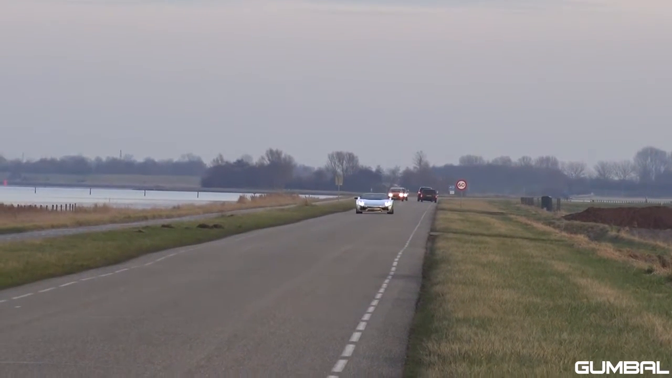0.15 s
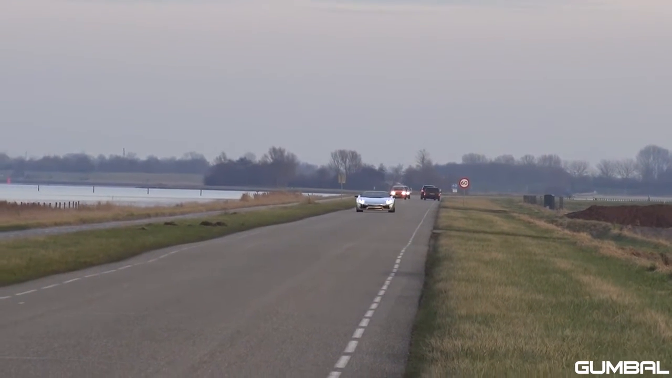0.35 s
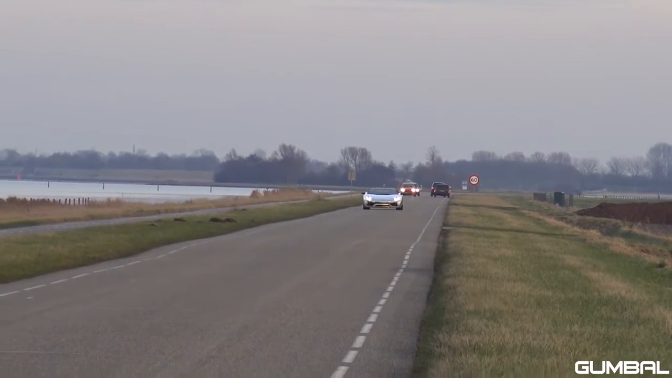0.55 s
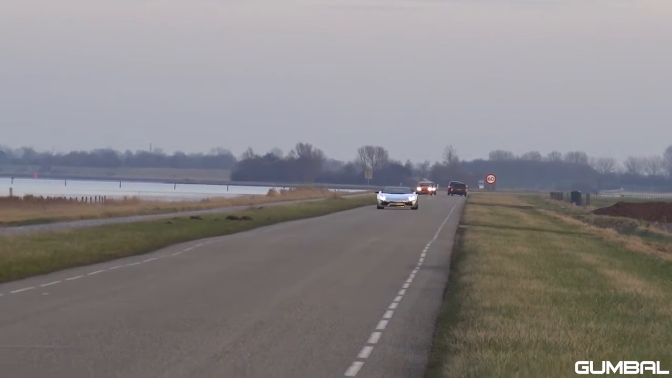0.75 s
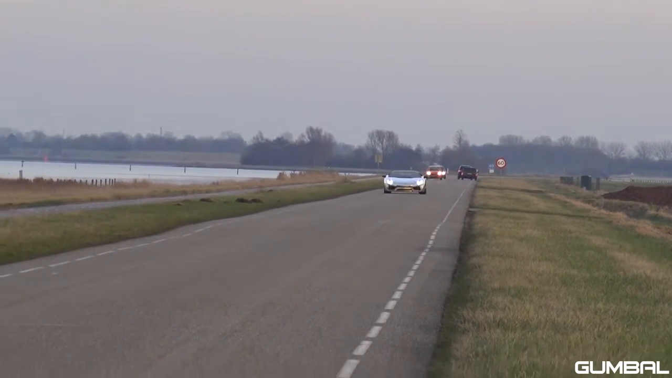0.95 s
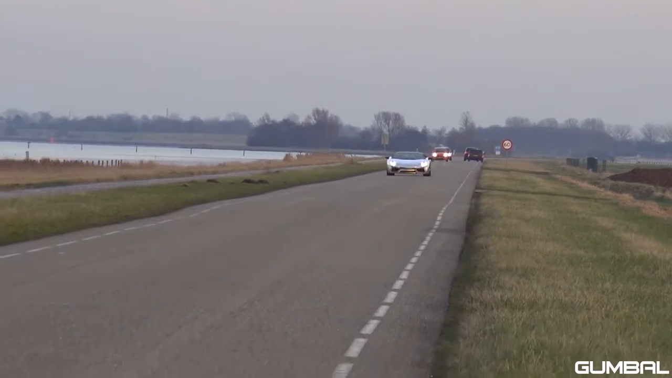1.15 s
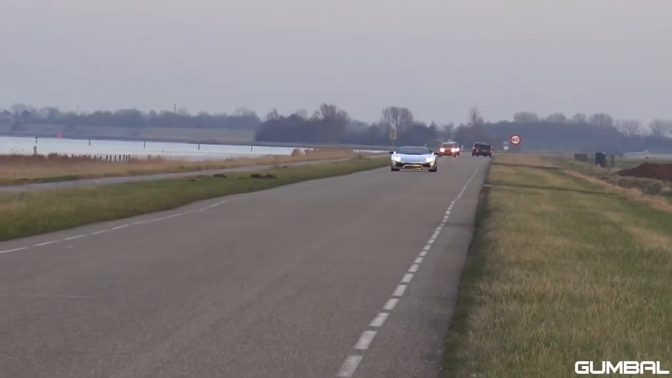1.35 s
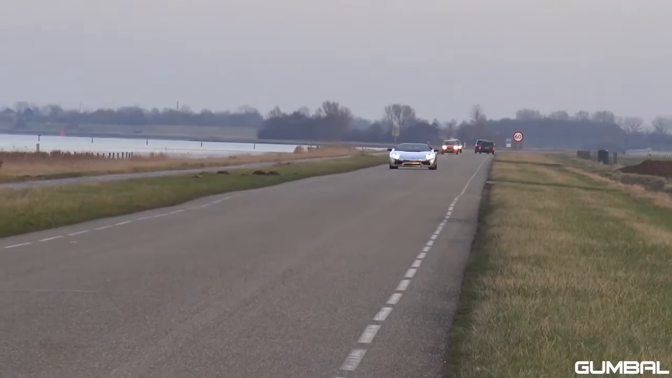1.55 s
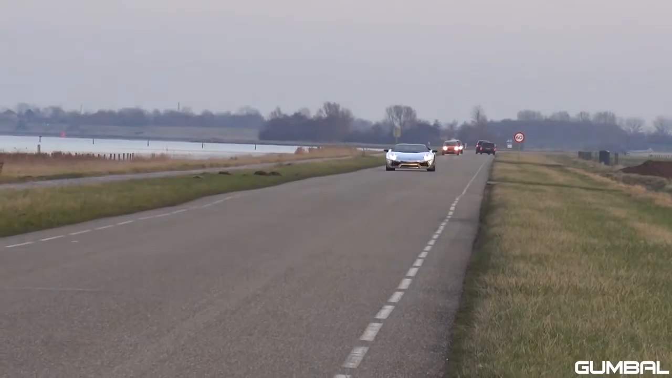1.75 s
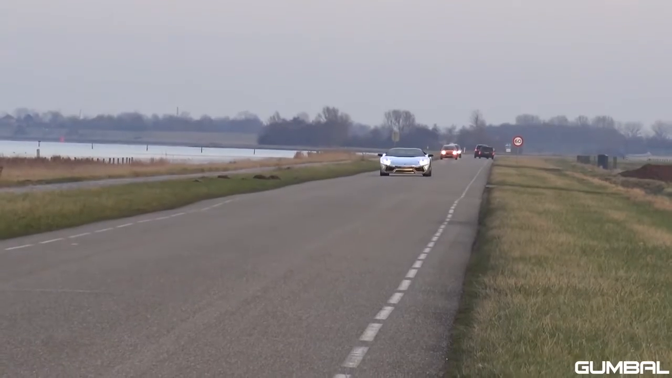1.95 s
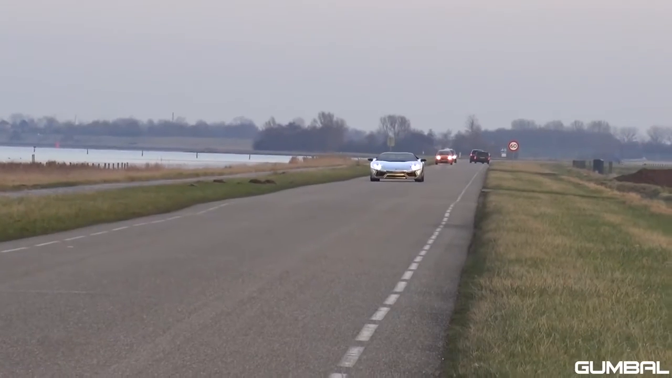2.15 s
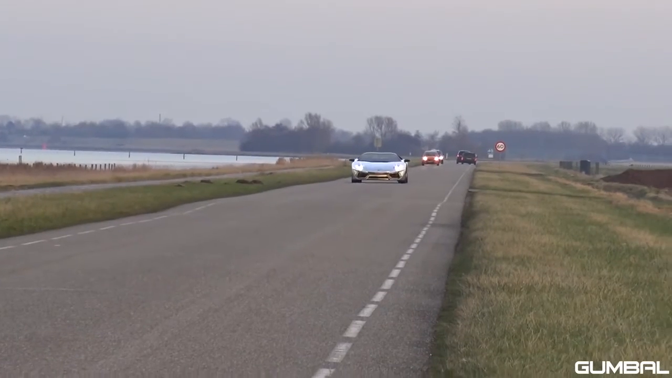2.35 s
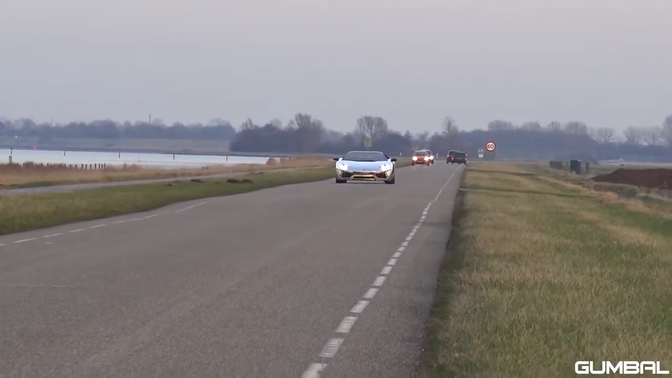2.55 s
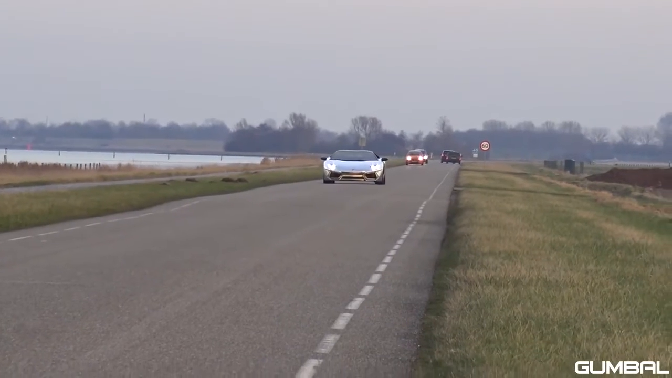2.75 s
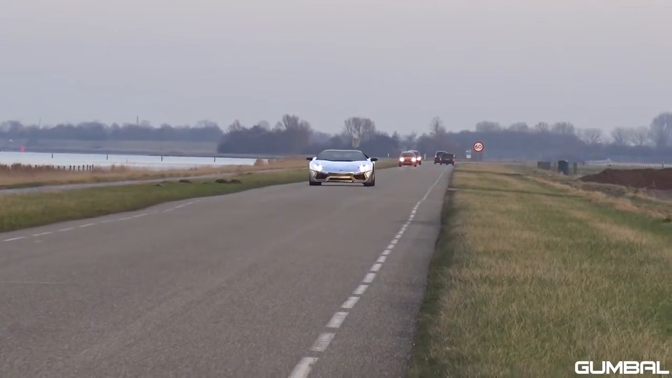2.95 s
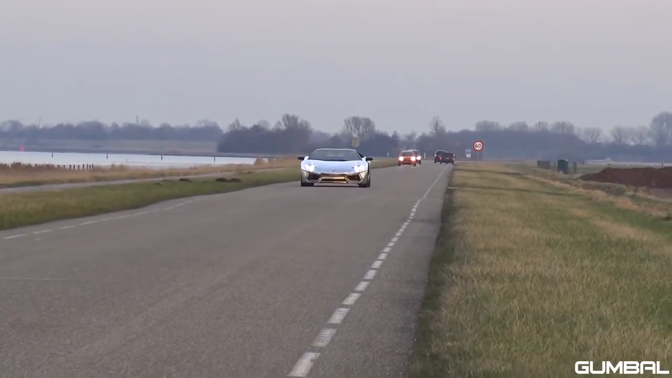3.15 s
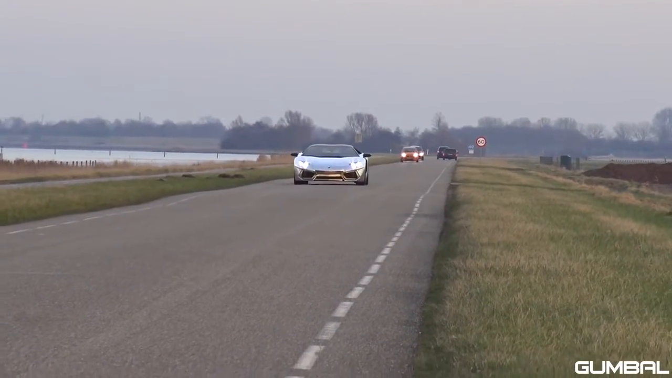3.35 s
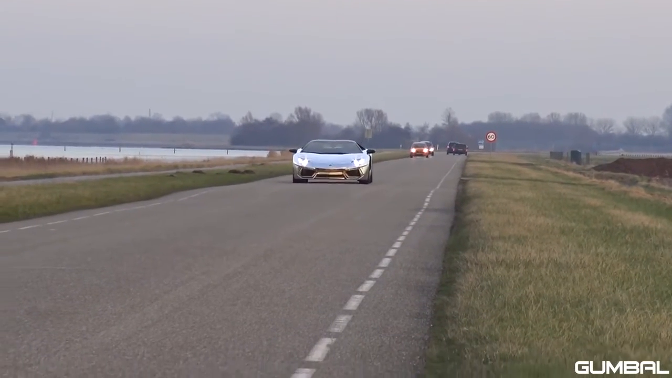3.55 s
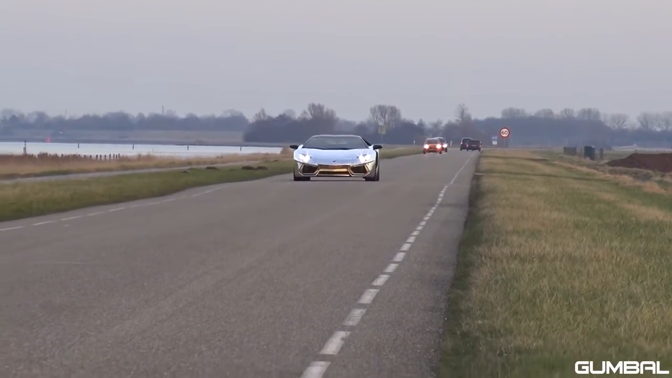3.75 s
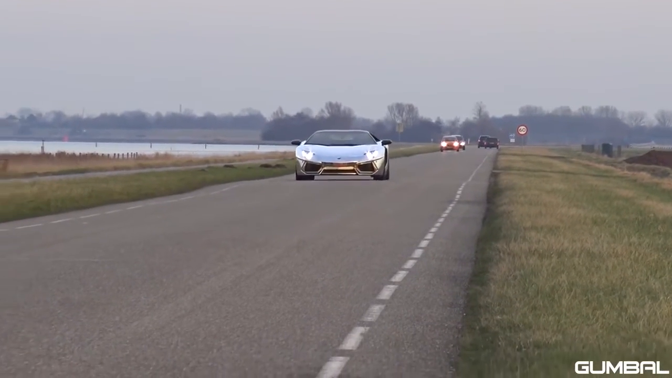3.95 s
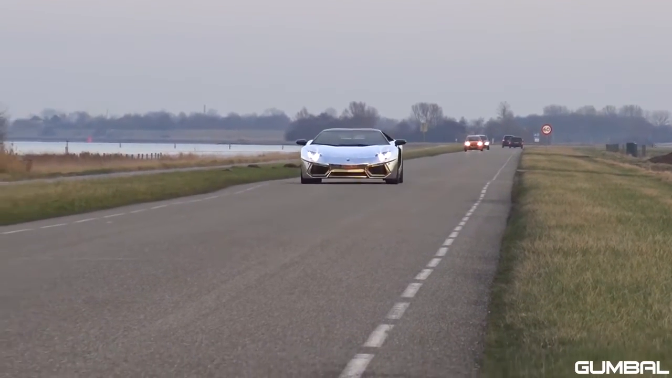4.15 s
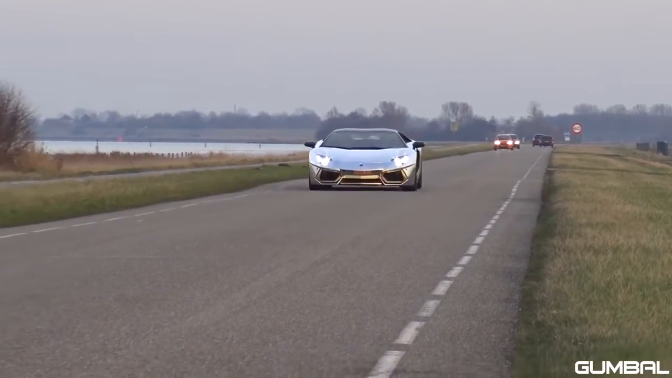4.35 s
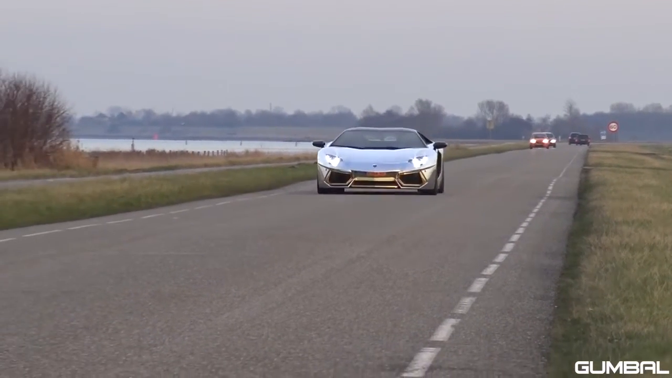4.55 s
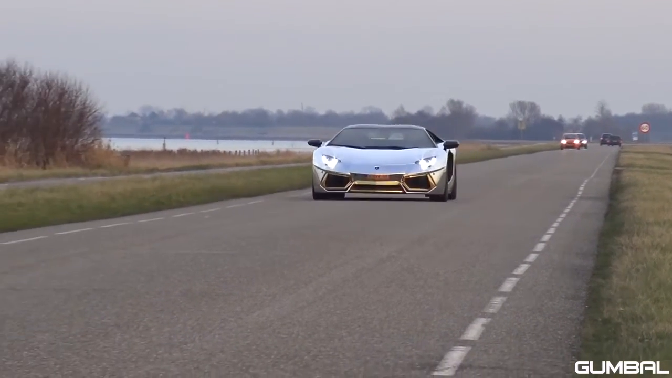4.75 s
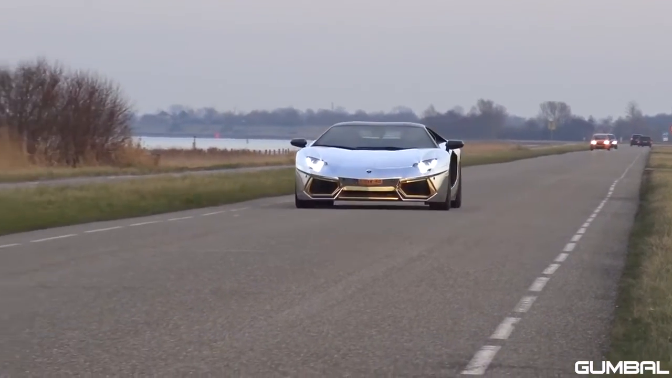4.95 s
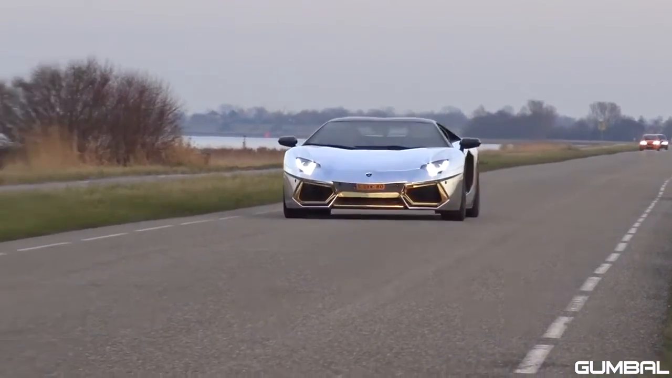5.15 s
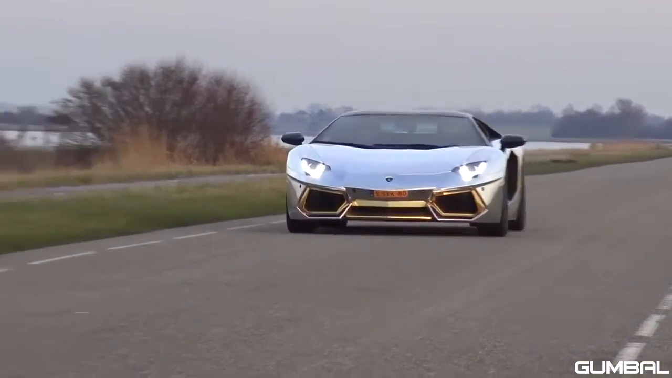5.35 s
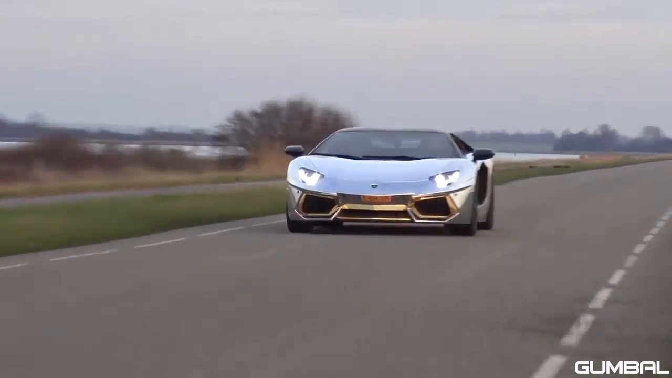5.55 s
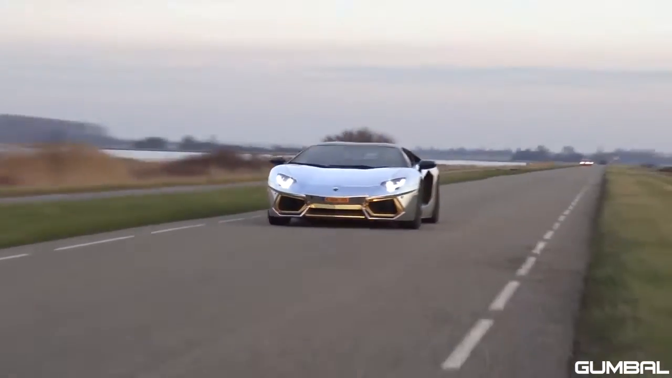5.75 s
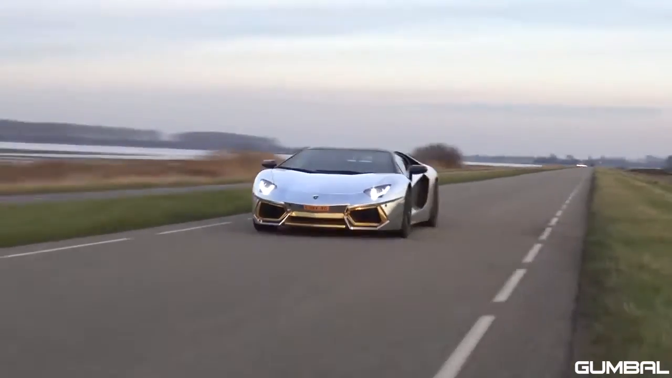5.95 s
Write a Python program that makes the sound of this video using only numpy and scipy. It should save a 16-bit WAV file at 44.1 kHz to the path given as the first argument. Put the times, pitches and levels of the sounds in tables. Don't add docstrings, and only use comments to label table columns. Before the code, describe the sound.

A single sports car accelerates from far away toward a roadside microphone. Its singing exhaust note rises gradually, with raspy overtones drifting in and out on the air and tyre and air noise swelling beneath. Low wind puffs bump the microphone throughout. After about four and a half seconds comes a half-second burbling upshift, then a lower, fuller, wavering howl that steadies and climbs as the car closes in.

```python
import sys
import numpy as np
from scipy import signal
from scipy.fft import rfft, irfft, next_fast_len
from scipy.io import wavfile

SR = 44100
rng = np.random.default_rng(int(sys.argv[2]) if len(sys.argv) > 2 else 0)


def attenuation_scalar(level_db):
    decades = np.asarray(level_db, float) / 20
    return 10 ** decades


def transcribe(u):
    v = np.clip(np.atleast_2d(u).T, -1, 1)
    q = np.round(v * 32767).astype(np.int16)
    wavfile.write(sys.argv[1], SR, q)


N = 268569


def seconds():
    return np.arange(N) / SR


def in_time(rows):
    s, *columns = np.transpose(rows)
    return [np.interp(seconds(), s, column) for column in columns]


def at_hz(points, hz):
    table_hz, db = np.transpose(points)
    return np.interp(np.log(hz), np.log(table_hz), db)


def rms_one(x):
    return x / np.sqrt(np.mean(x ** 2) + 1e-20)


def drift(rate_hz):
    r = np.exp(-80 * np.pi * rate_hz / SR)
    noise = rng.standard_normal(N // 40 + 2002)
    slow = signal.lfilter([1], [1, -2 * r, r * r], noise)[2000:]
    return np.interp(np.arange(N) / 40, np.arange(len(slow)), rms_one(slow))


def line(turns, multiple, db, flutter_db, blur_rad):
    phase = 2 * np.pi * (multiple * turns + rng.random()) + blur_rad * drift(25)
    return np.sqrt(2) * attenuation_scalar(db + flutter_db * drift(24)) * np.sin(phase)


# t/s, firing line loss/dB, burble level/dB
SHIFT = [
    (4.59, 0, -57.5),
    (4.605, -5.5, -25.5),
    (4.68, -9.5, -29.5),
    (4.8, -19, -24),
    (4.83, -24, -34.5),
    (4.92, -34, -27.5),
    (4.945, -11, -27.5),
    (5.02, -3, -26),
    (5.075, -3, -22),
]
RELIGHT_S = 0.043


def shifting(s):
    end = SHIFT[-1][0]
    return np.interp(s, [SHIFT[0][0], SHIFT[1][0], end, end + RELIGHT_S], [0, 1, 1, 0])


# t/s, four-stroke cycle rate f/Hz
SPEED = [(0, 57.4), (.1, 57), (.38, 59.2), (1.24, 63.5), (2.04, 68.1), (2.47, 70.6), (3.02, 73.4),
         (3.7, 76.5), (4.1, 78.1), (4.58, 79.5), (4.79, 79), (4.9, 73.4), (4.95, 70), (5.02, 64.3),
         (5.16, 64.5), (5.5, 66.5), (5.94, 69.4), (6.09, 69.8)]
# t/s, level/dB
FIRING = [(0.1, -33), (.41, -29.5), (.83, -28), (.93, -29), (1.27, -25.5), (1.44, -29), (2.85, -23),
          (3.17, -25.5), (3.65, -22), (4.07, -22.5), (4.22, -24.5), (4.56, -21.5), (5.14, -14.5),
          (5.21, -15), (5.3, -13.5), (5.43, -15.5), (5.55, -13), (6.09, -15)]


def engine():
    since = np.maximum(seconds() - 4.99, 0)
    shunt_hz = 1.7 * np.exp(-since / 0.27) * np.sin(2 * np.pi * 8.1 * since)
    loss_db, = in_time([row[:2] for row in SHIFT] + [(SHIFT[-1][0] + RELIGHT_S, 0)])
    return in_time(SPEED)[0] - shunt_hz, in_time(FIRING)[0] + loss_db


# centre t/s, half length t/s, band f/Hz, level/dB, extra rasp level/dB
CLEAR_AIR = [(.33, 0.18, 3760, 9, 13), (.2, 0.36, 2480, 0.5, 1), (0.396, 0.26, 1980, 7, 13),
             (1.706, .2, 2430, 0.5, 15), (1.75, 0.12, 3800, 1.5, 7), (2.45, .33, 3800, 11.5, 8.5),
             (3.147, .45, 4600, 16, 1.5), (3.9, .35, 3480, 8.5, 3.5), (4.65, 0.32, 3100, 4, -1)]


def clear_air(s, hz, rasp):
    gain_db = rasp * -11
    for centre_s, half_s, band_hz, db, rasp_db in CLEAR_AIR:
        spell = ((s - centre_s) / half_s) ** 4
        octaves = np.log2(hz / band_hz) / 0.35
        gain_db = gain_db + (db + rasp * rasp_db) * np.exp(-spell - octaves ** 2)
    return gain_db


# t/s, level at 1.2 kHz/dB
ROAR = [(0.0, -37), (0.37, -39), (1.61, -36.5), (1.91, -37), (2.42, -34), (2.95, -34), (3.12, -33),
        (3.54, -31), (3.66, -31.5), (4.07, -30), (4.53, -28.5), (4.99, -27), (5.36, -23), (5.73, -21),
        (6.09, -20)]
# f/Hz, level per Hz/dB
ROAR_COLOUR = [(50, -23.5), (200, -14.5), (330, -14), (480, -11.5), (830, -10), (1300, -9), (1900, -15),
               (2700, -23), (3900, -27.5), (4600, -26), (6200, -36.5), (8000, -42.5), (10000, -52),
               (13000, -56)]
# t/s, distance/m
DISTANCE = [(0, 267), (1, 237), (1.5, 215), (2, 168), (2.6, 160), (3.1, 125), (3.5, 116), (4.2, 87),
            (5, 64), (5.4, 47), (5.65, 35.6), (6.09, 28.2)]
CLOSE_M = 40.8


def roar_level(hz, rasp=False):
    coarse = np.arange(0, N + 200, 200)
    s = coarse / SR
    hz = (hz + np.zeros(N))[np.minimum(coarse, N - 1)]
    level_db = np.interp(s, *np.transpose(ROAR))
    metres = np.interp(s, *np.transpose(DISTANCE))
    far_db = 20 * np.log10(CLOSE_M / metres)
    bass_db = 0.56 * far_db + 4.5 * shifting(s)
    top_db = 2.32 * far_db
    place = np.interp(np.log(hz), np.log([260, 1170, 2500, 5800, 12000]), np.arange(5))
    bend_db = 0
    for k, db in enumerate([bass_db, 0, 3, top_db, 1.1 * top_db]):
        bend_db = bend_db + np.clip(1 - abs(place - k), 0, 1) * db
    dip_hz = 486000 / metres
    dip_db = -19 * np.tanh((metres / 98) ** 2) * np.exp(-(np.log2(hz / dip_hz) / 0.3) ** 2)
    total_db = level_db + at_hz(ROAR_COLOUR, hz) + bend_db + dip_db + clear_air(s, hz, rasp)
    return np.interp(np.arange(N), coarse, total_db)


BANK_ORDERS = (6, 9, 15, 18, 21, 24, 33)
BANK_DB = (-24, -5.5, -16, -11.5, -5.5, -6, -20)
# f/Hz, width f/Hz, level/dB
PIPE = [
    [(478.3, 57.5, 22), (408, 11, 8)],
    [(651, 21, -12.5), (498, 36, 5), (591, 22, 2.5), (715, 13, -1.5)],
    [(901, 150, 14), (1025, 23, 1.5), (855, 18, 4)],
    [(1060, 76, 6.5), (1350, 12, -6.5)],
    [(1198, 12, 6), (1260, 35, -9), (1395, 30, 4), (1450, 16, -7), (1670, 18, -4)],
    [(1365, 10, 6), (1440, 40, 8), (1520, 22, -5), (1715, 22, -11), (1775, 25, 3), (1835, 18, -11),
     (1912, 18, -16)],
    [(2446, 140, 7.5), (2150, 70, -10), (1886, 40, 4.5)],
]
# multiple of the cycle, level over the roar/dB
UNEVEN = [(2, -1), (3, -2.5), (7, -5.5), (8, -14), (10, -4), (11, -7.5), (14, -4), (16, -7), (17, -9.5),
          (20, -4.5), (30, -1.5)]
# multiple of the cycle, level over the roar/dB
RASP = [(27, 4), (36, 1), (39, 6), (42, 0), (45, 8), (48, 0), (51, 7), (54, 2), (57, 4), (60, 0), (63, 9)]


def exhaust(turns, firing_db, cycle_hz):
    out = line(turns, 12, firing_db, flutter_db=0.53, blur_rad=0.029)
    level_db = in_time(ROAR)[0] - 25 * shifting(seconds())
    flutter_db = 0.5 + 2 * np.minimum(CLOSE_M / in_time(DISTANCE)[0], 1) ** 2
    for multiple, db, pipe in zip(BANK_ORDERS, BANK_DB, PIPE):
        order_hz = multiple * cycle_hz
        pipe_db = sum(gain_db * np.exp(-((order_hz - hz) / width) ** 2) for hz, width, gain_db in pipe)
        fading_db = 1 * drift(4.2)
        out += line(turns, multiple, level_db + db + pipe_db + fading_db, flutter_db, blur_rad=0.21)
    for orders, rasp in ((UNEVEN, False), (RASP, True)):
        for multiple, db in orders:
            order_db = db + roar_level(multiple * cycle_hz, rasp)
            out += line(turns, multiple, order_db, flutter_db=2.5, blur_rad=0.4)
    return out


# multiple of the cycle, level at the limit/dB, level after the clutch bites/dB
BURBLE_ORDERS = [(1.08, -5.5, -8), (1.99, -8, -3.5), (2.98, -6.5, -9), (3.98, -14, -6.5), (5, -7.5, -8),
                 (6, 0.5, -21.5), (6.94, -15, 2), (7.8, -11.5, -5.5), (9, -14, -6), (10, 0, -12),
                 (10.91, -3, -27), (13.08, -9, -8), (14, -13, -17.5), (15.04, -20, -9.5), (16, -11.5, -14),
                 (16.9, -11, -24), (17.47, -16.5, -19.5), (20, -9, -15), (19.64, -9.5, -7)]


def burble(turns):
    level_db, = in_time([row[::2] for row in SHIFT] + [(SHIFT[-1][0] + RELIGHT_S, -65)])
    bitten = np.clip((seconds() - 4.925) / 0.03, 0, 1)
    out = 0
    for multiple, cut_db, bite_db in BURBLE_ORDERS:
        order_db = level_db - 4 + cut_db + bitten * (bite_db - cut_db)
        out = out + line(turns, multiple, order_db, flutter_db=3.2, blur_rad=0.015 * multiple + 0.2)
    return out


def bands(low_hz, count):
    edges = np.geomspace(low_hz, 16000, count + 1)
    white = rng.standard_normal((2, 2, N))
    for k, (low, high) in enumerate(zip(edges, edges[1:])):
        band = signal.butter(2, [low, high], "band", fs=SR, output="sos")
        yield np.sqrt(low * high), signal.sosfilt(band, white[k % 2])


def roar(turns):
    out, together = 0, drift(0.8)
    for hz, (direct, spread) in bands(50.6, count=34):
        gain = attenuation_scalar(roar_level(hz) + 23 + 0.45 * together + 0.89 * drift(27))
        scatter = attenuation_scalar(-15 + 3.2 * np.log2(hz / 1000))
        out = out + gain * (direct + scatter * spread * [[1], [-1]])
    return out * (1 + 0.15 * np.sin(6 * np.pi * turns))


# f/Hz, width f/Hz, level/dB
PORT_DIPS = [(4590, 400, -7), (7300, 240, -1.5), (9260, 320, -20), (15600, 1100, -15.5)]
# f/Hz, left minus right level/dB
PORT_BALANCE = [(60, 1.5), (380, -1), (700, 1), (1290, -2.5), (2380, 1.5), (4400, -3), (6500, 0.5),
                (8100, 2), (10500, 6), (15000, 9)]
# f/Hz, phase lag/rad
PORT_PHASE = [(0, 0), (1700, .55), (3900, 1.2), (5300, 2.2), (6600, 2.9), (9500, 3.3), (14000, 3.7)]


def ports(car):
    size = next_fast_len(N + 4096)
    hz = np.fft.rfftfreq(size, 1 / SR)
    notches_db = sum(db * np.exp(-((hz - centre) / width) ** 2) for centre, width, db in PORT_DIPS)
    colour = attenuation_scalar(notches_db + at_hz(PORT_BALANCE, hz + 1) * [[.5], [-.5]])
    lag = np.exp(-1j * np.interp(hz, *np.transpose(PORT_PHASE)) * [[0], [1]])
    return irfft(rfft(car, size) * colour * lag, size)[:, :N]


# t/s, peak level/dB
GUSTS = [(0.192, -39.5), (0.368, -32), (0.64, -30), (0.953, -33), (1.368, -32), (1.482, -31.5),
         (1.561, -30.5), (1.738, -33), (1.92, -28), (2.202, -31), (2.505, -33), (2.834, -41),
         (3.191, -29.5), (3.741, -31.5), (4.127, -32.5), (4.589, -31.5)]


def gusts():
    peak_s, peak_db = np.transpose(GUSTS)[:, :, None]
    since = seconds() - peak_s
    slope_db = np.where(since < 0, 247 * since, -38 * since)
    return np.maximum(-41, (peak_db - 5 + slope_db).max(axis=0))


def wind():
    eddies = np.tanh(np.array([drift(23), drift(22)]) / 2)
    pressure = attenuation_scalar(11 * eddies)
    low_band = signal.butter(1, [40, 140], "band", fs=SR, output="sos")
    rumble = rms_one(signal.sosfilt(low_band, rng.standard_normal((2, N))))
    no_steady = signal.butter(2, 8, "high", fs=SR, output="sos")
    left, right = rms_one(signal.sosfilt(no_steady, pressure - pressure[:, :1]))
    puffs = np.array([attenuation_scalar(5) * left, attenuation_scalar(0.5) * (right - 0.45 * left)])
    puffs = puffs + attenuation_scalar(-21) * pressure * rumble
    soften = signal.butter(2, 250, fs=SR, output="sos")
    return signal.sosfilt(soften, attenuation_scalar(gusts() + 3) * puffs)


def hiss():
    return attenuation_scalar(-57.5) * signal.lfilter([1, 0.12], [1], rng.standard_normal((2, N)))


# t/s, left minus right level/dB
PAN = [(0, 2), (1.2, 3), (3, 1.5), (4.56, 2), (5.2, 3), (6.09, 2.5)]


def scene():
    cycle_hz, firing_db = engine()
    turns = np.cumsum(cycle_hz) / SR
    car = exhaust(turns, firing_db, cycle_hz) + burble(turns) + roar(turns)
    pan_db, = in_time(PAN)
    return ports(car) * attenuation_scalar(pan_db * [[.5], [-.5]]) + wind() + hiss()


def band_limit(x):
    return signal.sosfilt(signal.butter(12, 15690, fs=SR, output="sos"), x)


def record(dry):
    top = 1.6
    dry = dry * np.minimum((N - np.arange(N)) / 100, 1)
    mix = top * np.tanh(dry / top)
    return band_limit(mix)


dry = scene()
out = record(dry)
transcribe(out)
```